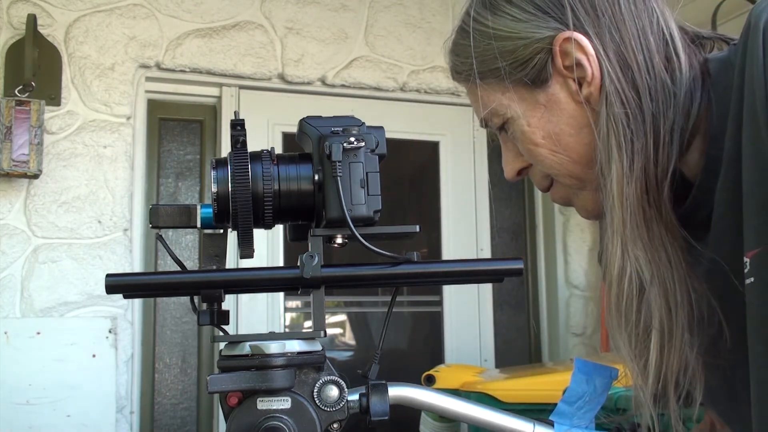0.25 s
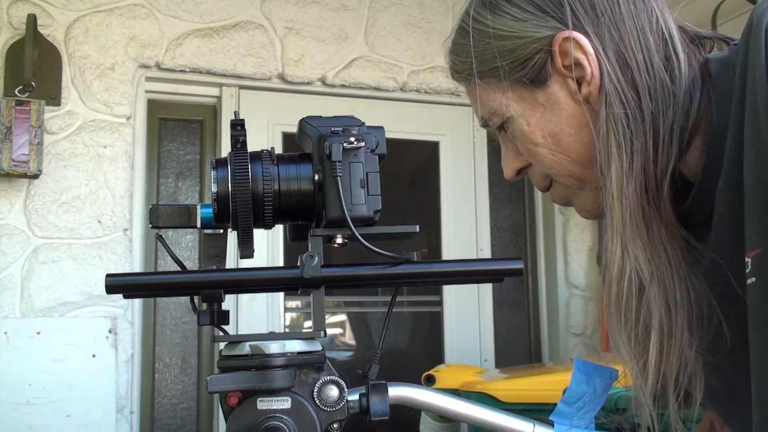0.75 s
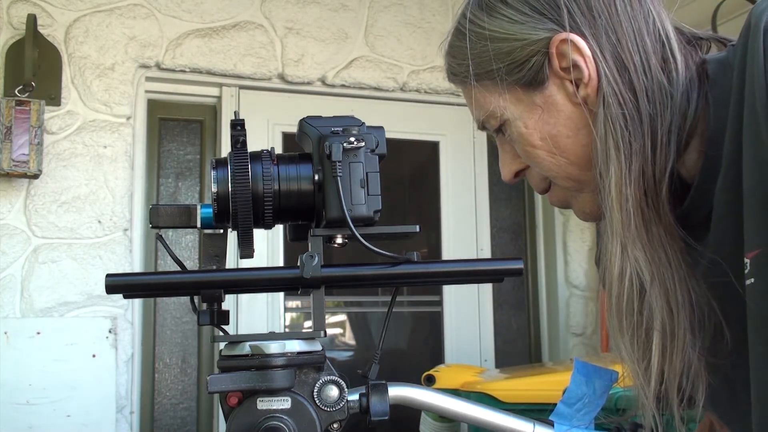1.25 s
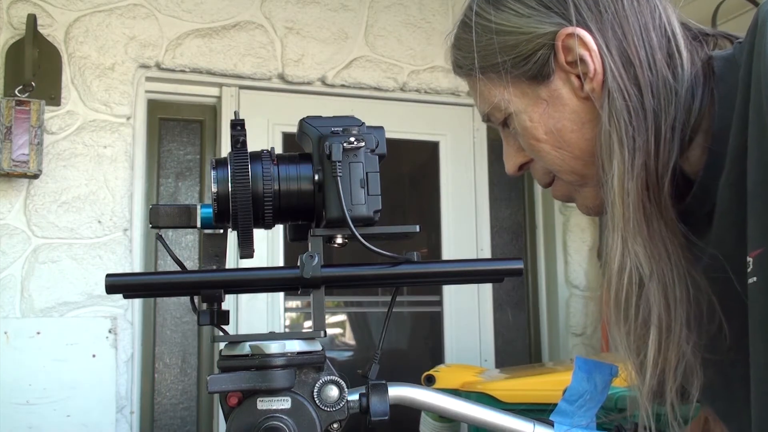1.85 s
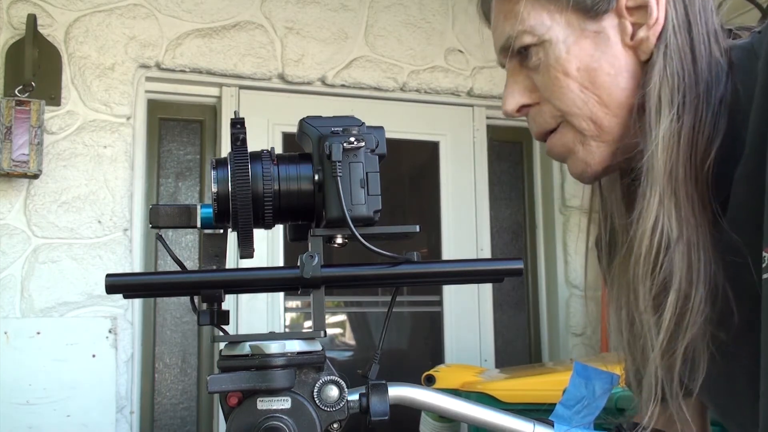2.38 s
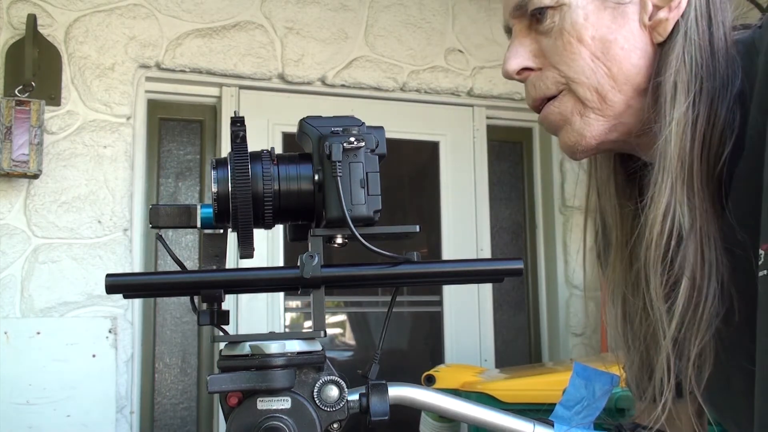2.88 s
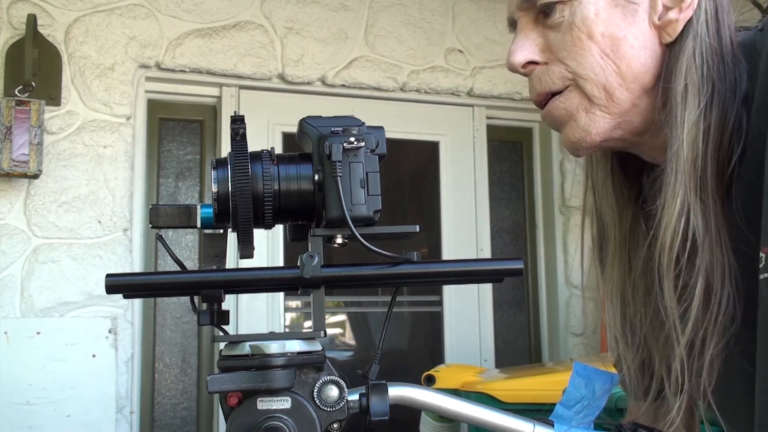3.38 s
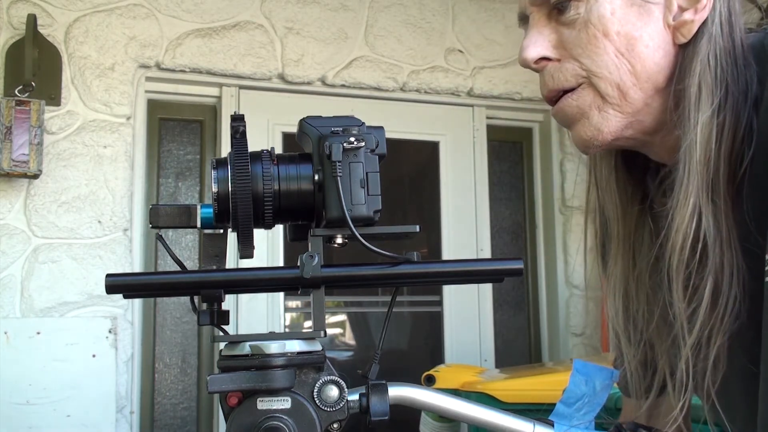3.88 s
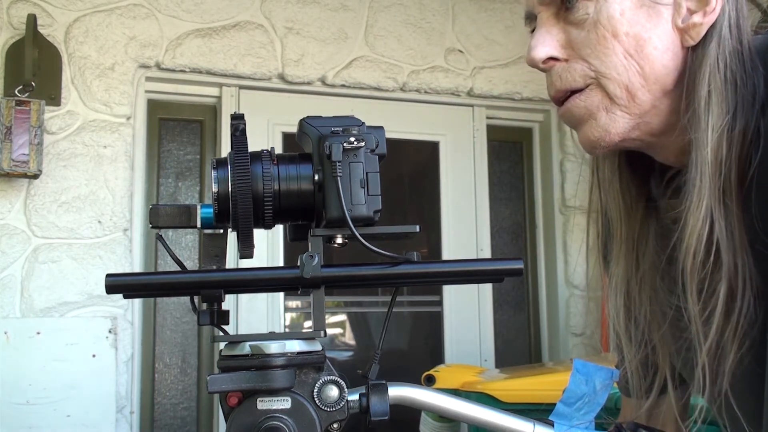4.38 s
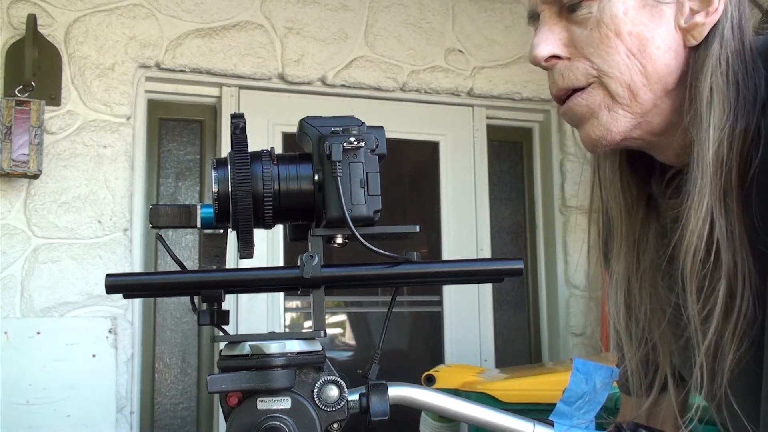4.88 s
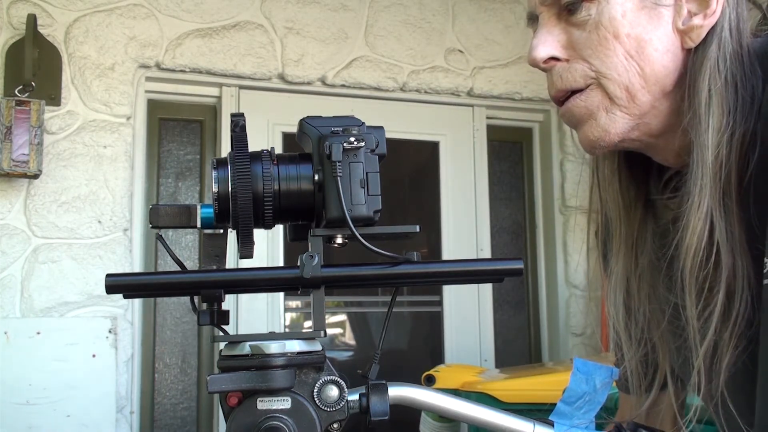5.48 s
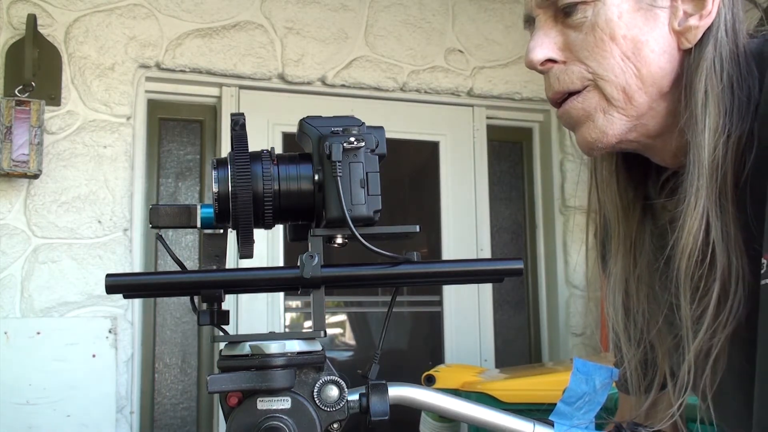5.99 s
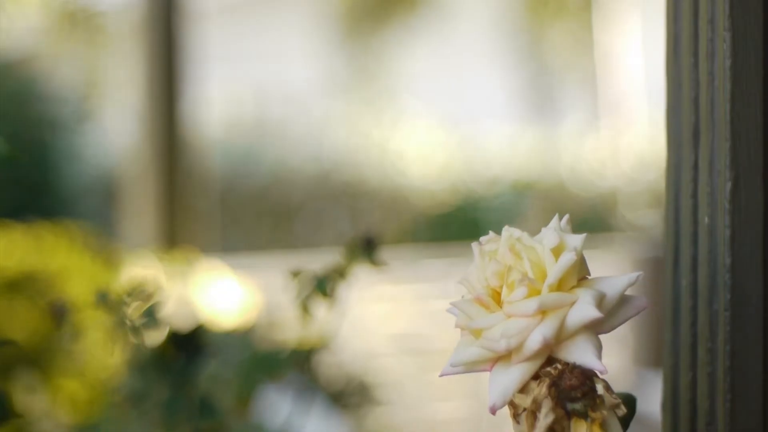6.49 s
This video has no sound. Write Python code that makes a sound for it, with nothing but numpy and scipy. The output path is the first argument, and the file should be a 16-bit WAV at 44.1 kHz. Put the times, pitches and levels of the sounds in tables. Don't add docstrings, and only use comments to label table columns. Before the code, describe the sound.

Close stereo pickup outdoors, faint wall reflections. Two crisp switch presses about a second apart, each followed by a dull little release tick, sit over gentle air hiss and low far-off traffic. Then a lens-turning motor runs continuously, grainy and metallic, its rapid tooth knocks ringing a rail and pulsing with uneven load. A faint distant engine hums beneath. Everything stops instantly near the end.

```python
import sys
import numpy as np
from scipy import signal
from scipy.fft import rfft, irfft, next_fast_len
from scipy.io import wavfile
from scipy.ndimage import map_coordinates

SR = 44100
rng = np.random.default_rng(int(sys.argv[2]) if len(sys.argv) > 2 else 0)


def decibels_to_gain(level_db):
    exponent = np.asarray(level_db, float) / 20
    return 10 ** exponent


def generate_wav(sig):
    pcm = np.round(np.clip(np.atleast_2d(sig).T, -1, 1) * 32767).astype(np.int16)
    wavfile.write(sys.argv[1], SR, pcm)


N = 297480
T = np.arange(N) / SR

# (frequency [Hz], density [dB per Hz])
AIR_COLOUR = [(88, -37), (150, -3), (231, -3), (618, -5), (674, -10.5), (728, -7.5), (875, -5),
              (1500, -16.5), (1950, -44.5), (3300, -120)]
# (frequency [Hz], density [dB per Hz])
HISS_COLOUR = [(590, -26.5), (1000, -5), (1270, -5), (1450, 0), (1570, -1), (1910, -2.5), (2240, -2.5),
               (2400, -3), (4680, -5.5), (6170, -4), (9570, -11.5), (12900, -14.5), (15700, -23)]
# (frequency [Hz], density [dB per Hz])
RUMBLE_COLOUR = [(12, -31), (20, -10), (59, 2.5), (92, 0.5), (112, -10), (162, -6), (178, -10.5),
                 (200, -7.5), (260, -15.5), (440, -120)]
RUMBLE_DB = -59.5
# (time [s], rise [dB], length [s])
SWELLS = [(.17, 0.5, .06), (.69, 3, 0.12), (1.42, 4.5, 0.082), (1.65, 2, 0.039), (1.91, 2.5, 0.072),
          (2.83, 3, .05), (3.5, 7.5, .1), (3.75, 4.5, .05), (5.05, 2.5, 0.1), (5.88, 8.5, 0.036),
          (6.01, 5.5, .04)]
# (frequency [Hz], width [Hz], level [dB])
MACHINE_TONES = [(681.3, 9.8, -60.5), (120.4, 4.1, -62.5), (502.6, 9, -74)]
# (time [s], pitch [Hz], level [dB])
ENGINE = [(2.9, 104, -72.5), (3.3, 103.5, -62.5), (3.6, 103.4, -55.5), (4.2, 103, -57), (4.9, 102.6, -55),
          (5.2, 102, -61), (6.1, 101.7, -55.5)]
# (frequency [Hz], correlation [0-1])
ALIKE = [(30, 1), (80, 1), (170, 0.98), (350, 0.95), (700, 0.75), (3000, 0.71), (5500, 0.93), (7500, 0.96),
         (9500, 0.64), (11300, 0.63), (11700, 0.99)]
# (frequency [Hz], t60 [s])
PORCH_T60 = [(200, 0.18), (2000, 0.12), (10000, 0.064)]
# (frequency [Hz], level [dB])
MIC_SHELF = [(13500, 0), (13900, -2), (15700, -2)]
MIC_TOP_HZ, MIC_LEAN_DB = 15780, -0.1
PORT_DB, PORT_HZ = -77.5, 90

# (time [s], peak [dB])
PRESSES = [
    (0.1135, -19.5),
    (0.9956, -19),
]
# (time [s], peak [dB], pitch [Hz])
RELEASES = [
    (0.3825, -38.5, 2060),
    (0.4075, -45.5, 2130),
    (1.1233, -41.5, 2130),
]
# (frequency [Hz], width [Hz], level [dB])
SWITCH_MODES = [(2150, 260, -1), (4150, 500, -8), (5300, 900, -2), (6900, 450, 1), (10800, 800, -7),
                (12500, 1000, -10)]

STEP_HZ = 52.086
START_S, END_S = 2.0, 6.0678
# (time [s], lag [ms])
LAG = [(2.0, 4.3), (2.25, 5.2), (2.5, 5.7), (3.15, 6.3), (4.9, 6.8), (5.3, 7.2), (6.1, 8.0)]
# (multiple of the step rate [-], level [dB])
HUM_ORDERS = [(3, -62.5), (4, -64.5), (5, -65), (6, -72), (7, -73), (8, -56.5), (9, -60.5), (10, -61),
              (11, -72), (12, -63.5), (13, -67), (14, -69), (15, -69), (20, -70)]
# (frequency [Hz], density [dB per Hz])
WHIRR_COLOUR = [(76, -35), (130, -0.5), (357, -10.5), (417, -1.5), (568, -12), (682, -1), (1100, -8.5),
                (1300, -5), (1690, -32), (2860, -120)]
# (delay [ms], rail blow [dB], rattle [dB], rattle brightness [dB], tick [dB])
CONTACTS = [
    (0, -1, -3, 3, 1.5),
    (3.6, -2.5, -3, 8, -6),
    (6.7, 2, -8.5, 1, -5),
    (9.9, -7, -9.5, 16.5, -15.5),
]
BLOW, RATTLE, BRIGHTNESS, TICK = 1, 2, 3, 4
# (time [s], first [dB], second [dB], third [dB])
REBOUNDS = [(2.0, 0, -9, -12), (2.22, 0, -8, -12), (2.3, -2, -1, -6), (3.9, -2, 0, -4), (4.35, -1, 0, -4),
            (4.5, -4, -6, -8), (5.3, -5, -7, -8), (5.45, -5, -5, -3), (6.1, -4, -6, -5)]

# (time [s], load [dB], play [dB])
LOAD = [(2.0, 0, -2.5), (2.3, 0, -1.5), (2.62, 1.5, .5), (2.94, 0, 0), (3.08, -2, -0.5), (3.5, -5, -0.5),
        (3.92, -11, 2), (4.16, -9, -2), (4.37, -8.5, 0.5), (4.7, -0.5, -2), (5.13, 0, -2.5),
        (5.4, 2.5, -1.5), (5.5, 5, 0), (5.9, 2, 0), (5.97, 1, 3.5), (6.06, 1.5, 2.5)]
# (start [s], length [s], extra load [dB])
BINDS = [
    (2.06, 0.15, 6),
    (2.42, .1, -0.5),
    (2.829, 0.12, 1),
    (3.181, 0.2, 6.5),
    (3.6, 0.16, 6),
    (4.03, 0.23, 4.5),
    (4.399, .22, 6),
    (4.861, 0.15, 4),
    (5.226, 0.12, 3),
    (5.656, 0.095, 0.5),
]
BIND_EDGE_S = 0.018
BARREL_OUT_S, BARREL_SLIDE_S = 4.1, 0.17
FLUTTER_RATE = 8
# (level [dB], follows load [dB/dB], follows binding [dB/dB],
# follows play [dB/dB], change with the barrel out [dB], flutter [dB])
SHAKE = [(-0.5, 0.02, 0.23, 0.003, 0.3, 0)]
RINGS = [
    (-60.5, 1.1, .9, 0, 2, .8),
    (-57, 1.05, 1.15, 0, 2, .9),
    (-57.5, .9, .7, 0, -5, 1.2),
]
CHATTER = [
    (-54.5, 0.45, 0.67, 0.8, -0.5, 0.67),
    (-58, 0.96, 1.44, 0.03, 0, 0.4),
    (-59, 0.37, 0.6, 1.1, -1.1, 1.1),
]

# (frequency [Hz], density [dB per Hz])
DULL_COLOUR = [(1410, -8.5), (2400, -0.5), (3160, -4.5), (3610, -1.5), (4040, -3), (4310, -1.5),
               (4630, -2.5), (7750, 0), (9000, -13.5), (11700, -36.5), (19800, -120)]
# (frequency [Hz], density [dB per Hz])
BRIGHT_COLOUR = [(5000, -29.5), (8500, -2.5), (10500, -5), (12000, 0.5), (13200, -9), (14300, -9),
                 (15700, -22.5)]
# (frequency [Hz], width [Hz], level [dB])
TEETH_MODES = [(2600, 400, -6), (3620, 240, 4), (4400, 500, -3), (5500, 900, -3), (7300, 1200, -6)]
# (frequency [Hz], width [Hz], level [dB])
PINION_MODE = [(5480, 60, 0)]
# (time [s], level [dB])
PINION_RING = [(2.0, -7), (2.3, -14), (3.0, -10.5), (3.5, -22.5), (6.1, -21)]

# (frequency [Hz], width [Hz], level [dB])
NEAR_END_MODES = [(1200, 180, -10), (1358, 46, 4)]
# (frequency [Hz], width [Hz], level [dB])
FAR_END_MODES = [(1240, 110, -6), (1300, 44, 0), (1390, 90, -12)]
# (frequency [Hz], width [Hz], level [dB])
MIDDLE_MODES = [(1500, 120, -12), (1592, 90, -4), (1725, 90, 0), (1870, 56, -1)]
# (frequency [Hz], width [Hz], level [dB])
HIGH_MODES = [(2030, 120, -4), (2145, 40, 4.5), (2255, 60, -7.5), (2480, 150, -9)]
# (time [s], travel [0-1])
TRAVEL = [(2.0, .03), (3.3, .05), (3.55, .9), (4.4, .93), (6.1, .97)]
FAR_DB = -2.5
# (start [s], rise [s], fall [s], level [dB])
SING = (5.43, .025, .22, 6.5)
LOCKED_ORDERS = [33, 36]
LOCKED_DB = [-26, -31]
LOCK_HZ = 12


def unit(x):
    return x / np.sqrt(np.mean(x ** 2) + 1e-20)


def along(points, hz):
    f, v = np.transpose(points)
    return np.interp(np.log(hz + 1), np.log(f + 1), v)


def curves(rows):
    s, *cols = np.transpose(rows)
    return [np.interp(T, s, c) for c in cols]


def wobble(rate):
    knots = rng.standard_normal(int(N * rate / SR) + 4)
    return map_coordinates(knots, [T * rate])


def filtered(x, response):
    m = next_fast_len(N + SR // 2)
    return irfft(rfft(x, m) * response(np.fft.rfftfreq(m, 1 / SR)), m)[..., :N]


def resonant(x, modes):
    def response(f):
        total = 0
        for k, (centre, width, db) in enumerate(modes):
            damping = 1j * f * abs(width)
            total = total + (-1) ** k * decibels_to_gain(db) * damping / (centre * centre - f * f + damping)
        return total
    return unit(filtered(x, response))


def coloured(x, spectrum):
    return unit(filtered(x, lambda hz: decibels_to_gain(along(spectrum, hz))))


def spread(mid, side):
    def shares(hz):
        turn = np.arccos(np.clip(along(ALIKE, hz), -1, 1)) / 2
        return np.array([np.cos(turn), np.sin(turn)])
    mid, side = filtered(np.array([mid, side]), shares)
    return np.array([mid + side, mid - side])


def rush(spectrum):
    return spread(*coloured(rng.standard_normal((2, N)), spectrum))


def air():
    return decibels_to_gain(-56.0 + 0.35 * wobble(1.9)) * rush(AIR_COLOUR) + decibels_to_gain(-54.5) * rush(HISS_COLOUR)


def traffic():
    swell_db = sum(db * np.exp(-((T - s) / length) ** 2) for s, db, length in SWELLS)
    return decibels_to_gain(RUMBLE_DB + swell_db) * rush(RUMBLE_COLOUR)


def machine():
    return sum(decibels_to_gain(db) * resonant(rng.standard_normal(N), [(hz, width, 0)])
               for hz, width, db in MACHINE_TONES)


def engine():
    hz, db = curves(ENGINE)
    return np.sqrt(2) * decibels_to_gain(db + 1.2 * wobble(4.3)) * np.sin(2 * np.pi * np.cumsum(hz) / SR)


def ports():
    bass = lambda hz: (hz > 20) / (1 + (hz / PORT_HZ) ** 4)
    puff = decibels_to_gain(PORT_DB) * unit(filtered(rng.standard_normal(N), bass))
    return np.array([puff, -puff])


def porch(x):
    hz, t, z = signal.stft(rng.standard_normal((2, SR // 2)), SR, nperseg=256)
    decay = decibels_to_gain(-60 * t / along(PORCH_T60, hz)[:, None])
    tail = signal.istft(z * decay, SR, nperseg=256)[1]
    delayed = np.pad(x, (300, 0))[None]
    return signal.fftconvolve(delayed, tail / np.linalg.norm(tail[0]), axes=1)[:, :N]


def switch():
    strikes, ticks, t = np.zeros(N), np.zeros(N), np.arange(SR // 16) / SR
    snap = (t / 0.003) * np.exp(1 - (t / 0.0022) ** 2.1)
    bounce = (t > .0042) * (decibels_to_gain(-12.5 - 60 * (t - .0042) / .03) + decibels_to_gain(-13.0 - 60 * t / 0.16))
    for s, db in PRESSES:
        strike = decibels_to_gain(db + 25) * (snap + bounce) * rng.standard_normal(len(t))
        strikes[round(s * SR):][:len(t)] += strike
    for s, db, hz in RELEASES:
        tick = decibels_to_gain(db - 3.0 - 60 * t / 0.022) * np.sin(2 * np.pi * hz * t)
        ticks[round(s * SR):][:len(t)] += tick
    return decibels_to_gain(-67.5) * resonant(strikes, SWITCH_MODES) + ticks


def turns():
    return STEP_HZ * (T - START_S - curves(LAG)[0] / 1000)


def loaded(table):
    load_db, play_db = curves(LOAD)
    step = lambda s, width: (1 + np.tanh((T - s) / abs(width))) / 2
    bind_db = sum(db * (step(s, BIND_EDGE_S) - step(s + length, BIND_EDGE_S)) for s, length, db in BINDS)
    controls = np.array([load_db, bind_db, play_db, step(BARREL_OUT_S, BARREL_SLIDE_S)])
    return [decibels_to_gain(db + np.dot(follows, controls) + flutter_db * wobble(FLUTTER_RATE))
            for db, *follows, flutter_db in table]


def orders(table, unsteady_db):
    total = np.zeros(N)
    for k, db in table:
        level = np.sqrt(2) * decibels_to_gain(db + unsteady_db * wobble(3.96))
        cycles = k * turns() + 0.056 * wobble(4.8) + rng.uniform()
        total += level * np.sin(2 * np.pi * cycles)
    return total


def hum():
    build_up = 1 - np.exp(-np.maximum(T - START_S, 0) / 0.045)
    shake = loaded(SHAKE)[0] * orders(HUM_ORDERS, unsteady_db=1.5)
    whirr = decibels_to_gain(-56) * coloured(rng.standard_normal(N), WHIRR_COLOUR)
    return build_up * (shake + whirr)


def contacts(columns, jitter_ms, scatter_db):
    steps = np.flatnonzero(np.diff(np.floor(np.maximum(turns(), -.5))) > 0)
    table = np.array(CONTACTS)
    chance = rng.standard_normal((2, len(steps), len(table)))
    at = steps[:, None] + (table[:, 0] + jitter_ms * chance[0]) * SR / 1000
    rebound_db = np.transpose([np.zeros(N)] + curves(REBOUNDS))[steps]
    size = decibels_to_gain(table[:, columns].sum(1) + rebound_db + scatter_db * chance[1])
    return np.bincount(np.round(at).astype(int).ravel(), size.ravel(), N + SR)[:N]


def bursts(blows, t60, rest):
    flare = signal.fftconvolve(blows, decibels_to_gain(-60 * np.arange(SR // 20) / SR / t60))[:N]
    return (flare + rest) * rng.standard_normal(N)


def rattle():
    dull_gain, tick_gain, bright_gain = loaded(CHATTER)
    blows = contacts([TICK], jitter_ms=.03, scatter_db=1.3)
    pinion = decibels_to_gain(curves(PINION_RING)[0] + 3) * resonant(blows, PINION_MODE)
    ticks = resonant(blows, TEETH_MODES) + pinion
    ticks = filtered(ticks, lambda hz: 1 / (1 + 1j * hz / 8500) ** 3 * (1j * hz / (2200 + 1j * hz)) ** 2)
    dull_blows = contacts([RATTLE], jitter_ms=.1, scatter_db=1.5)
    dull = coloured(bursts(dull_blows, t60=0.0097, rest=0.2), DULL_COLOUR)
    bright_blows = contacts([RATTLE, BRIGHTNESS], jitter_ms=0.098, scatter_db=1.0)
    bright = coloured(bursts(bright_blows, t60=0.019, rest=0.39), BRIGHT_COLOUR)
    return dull_gain * dull + tick_gain * ticks + bright_gain * bright


def rail():
    low_gain, middle_gain, high_gain = loaded(RINGS)
    travel = np.clip(curves(TRAVEL)[0], 0, 1)
    blows = contacts([BLOW], jitter_ms=0.063, scatter_db=0.0)
    drive = unit(blows) + .55 * unit(bursts(blows, t60=0.046, rest=0.14))
    locked = sum(decibels_to_gain(db) * resonant(blows, [(k * STEP_HZ, LOCK_HZ, 0)])
                 for k, db in zip(LOCKED_ORDERS, LOCKED_DB))
    near, far, high = [resonant(drive, modes) for modes in (NEAR_END_MODES, FAR_END_MODES, HIGH_MODES)]
    middle = resonant(drive + locked, MIDDLE_MODES)
    start, rise, fall, sing_db = SING
    since = np.maximum(T - start, 0)
    swell = decibels_to_gain(FAR_DB + sing_db * (1.5 - np.exp(-since / rise)) * np.exp(-since / fall))
    low = np.sqrt(1 - travel) * near + np.sqrt(travel) * swell * far
    return low_gain * low + middle_gain * middle + high_gain * high


def scene():
    distant = air() + traffic() + machine() + engine()
    running = np.clip((T - START_S) / 0.0043, 0, 1)
    knocks = running * (rail() + rattle()) + switch()
    frame = hum()
    across = porch(knocks + frame)[1]
    middle = frame + knocks + decibels_to_gain(-10.5) * porch(knocks)[0]
    side = decibels_to_gain(-11.5) * across - decibels_to_gain(-23.5) * middle
    return spread(middle, side) + distant + ports()


def roll_off(x):
    return signal.sosfilt(signal.butter(12, 16230, fs=SR, output="sos"), x)


def record(dry):
    leaning = dry * decibels_to_gain([[MIC_LEAN_DB], [-MIC_LEAN_DB]])
    limited = filtered(leaning, lambda hz: decibels_to_gain(along(MIC_SHELF, hz)) * (hz < MIC_TOP_HZ))
    return roll_off(limited * (np.arange(N) < END_S * SR))


dry = scene()
out = record(dry)
generate_wav(out)
```